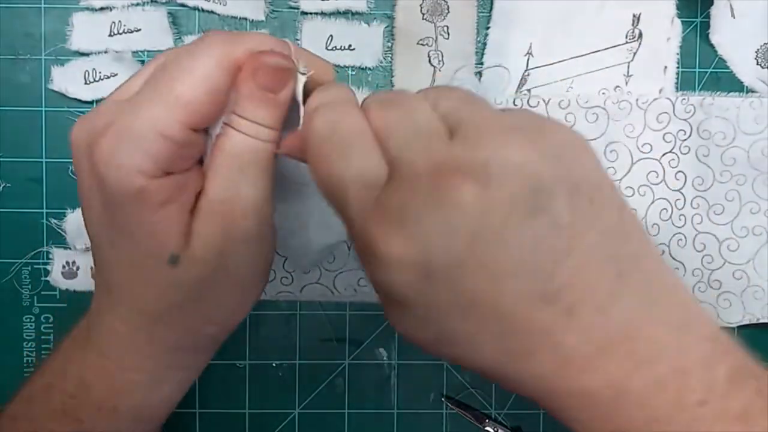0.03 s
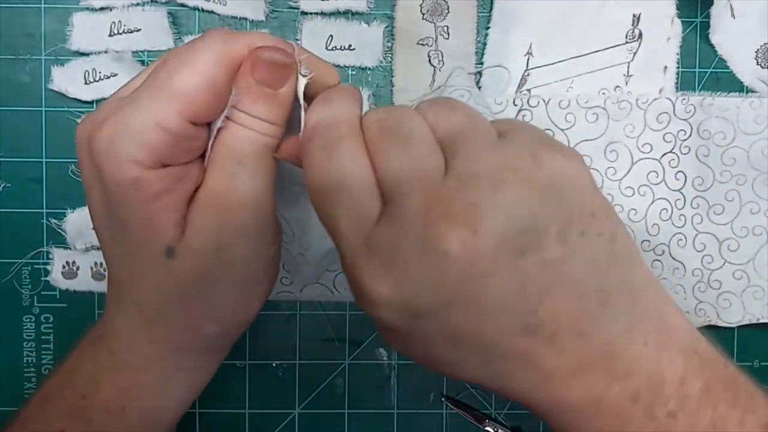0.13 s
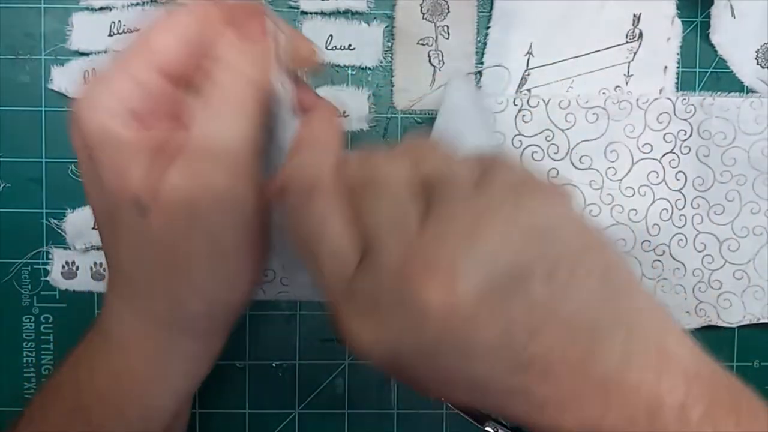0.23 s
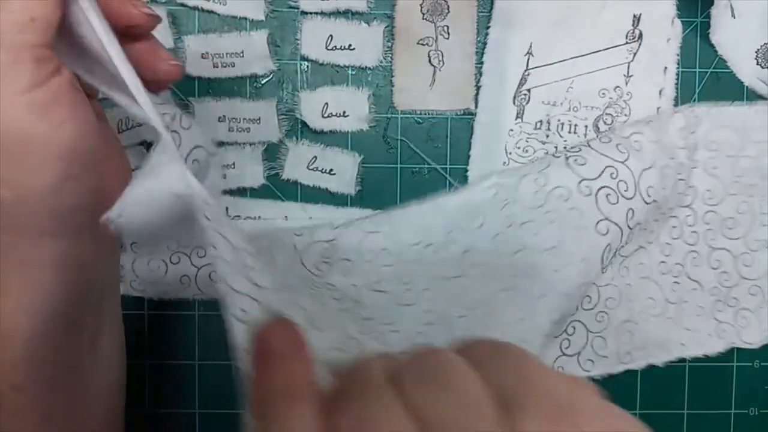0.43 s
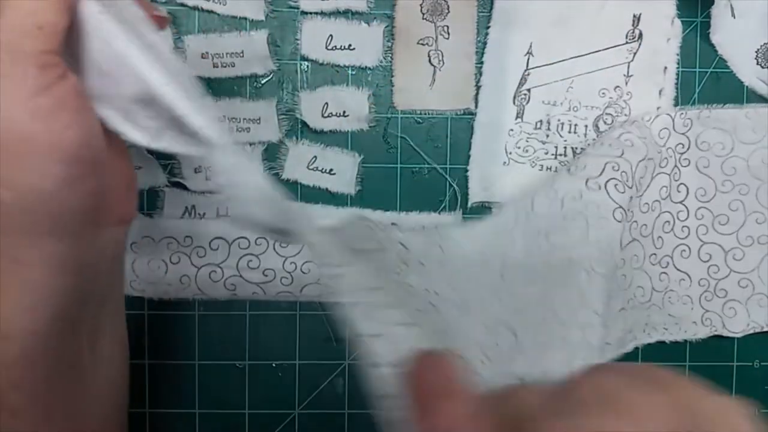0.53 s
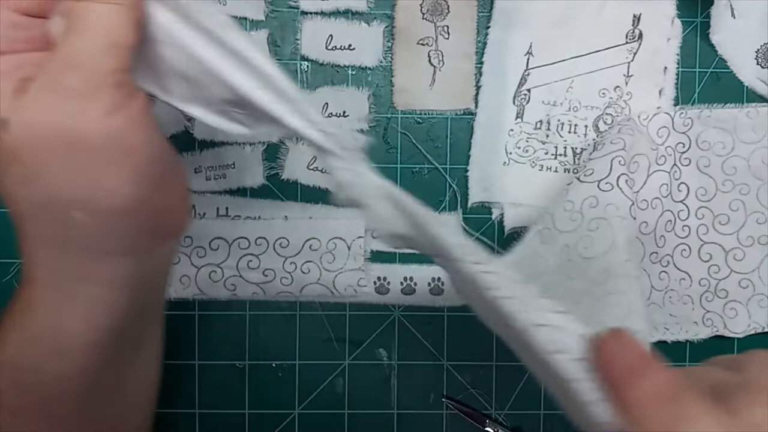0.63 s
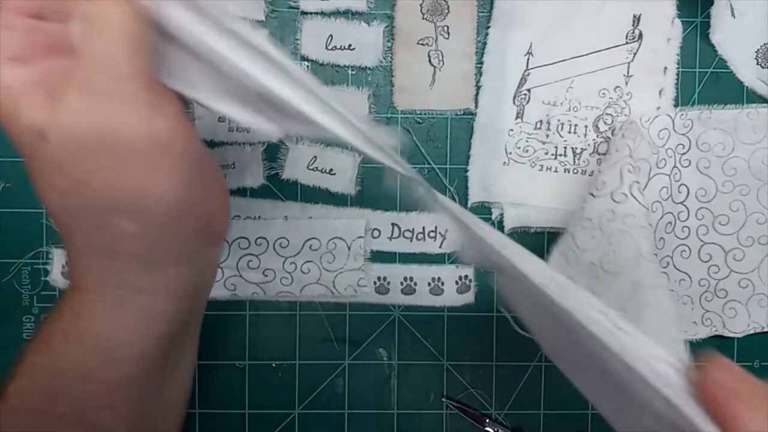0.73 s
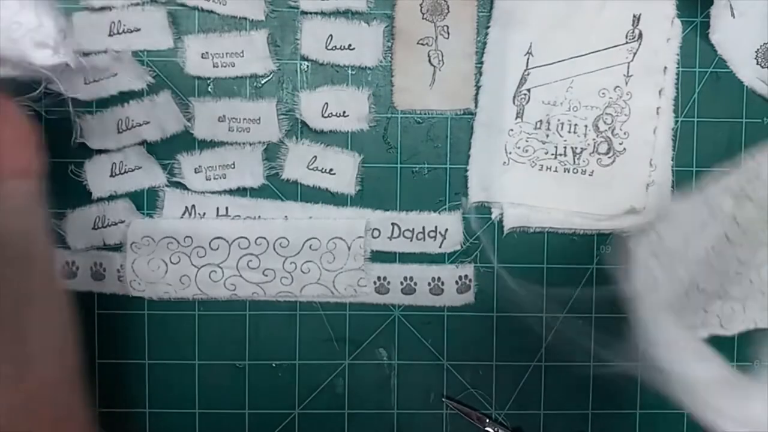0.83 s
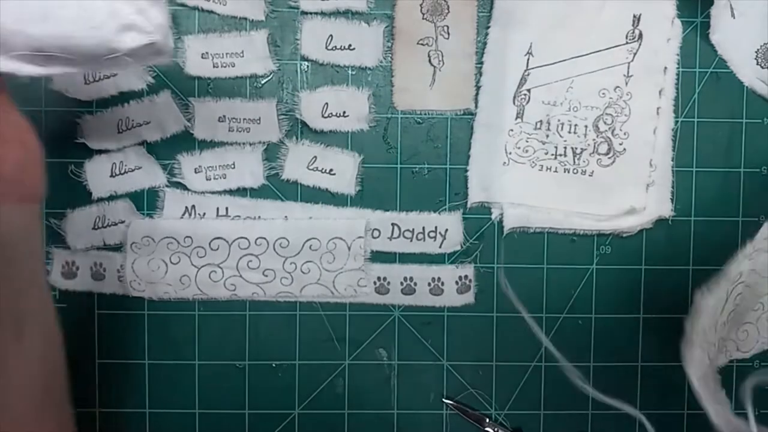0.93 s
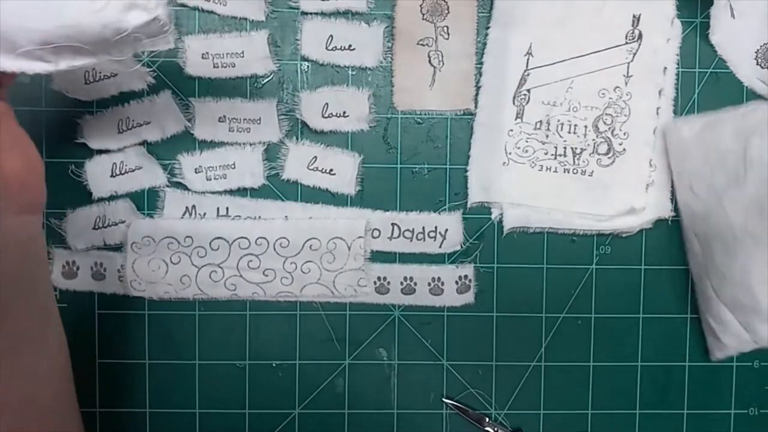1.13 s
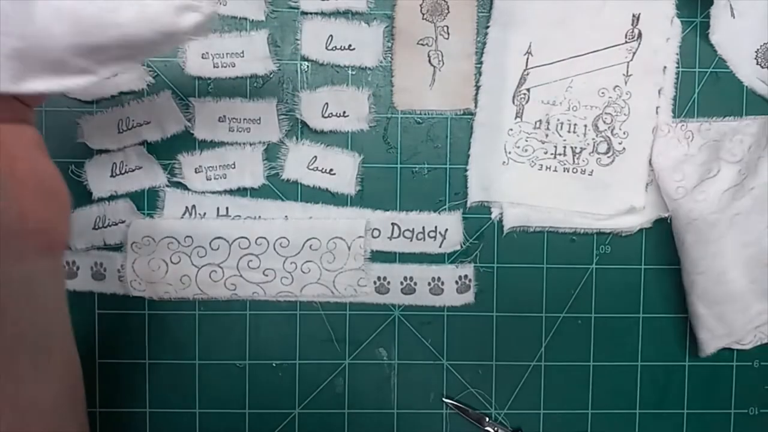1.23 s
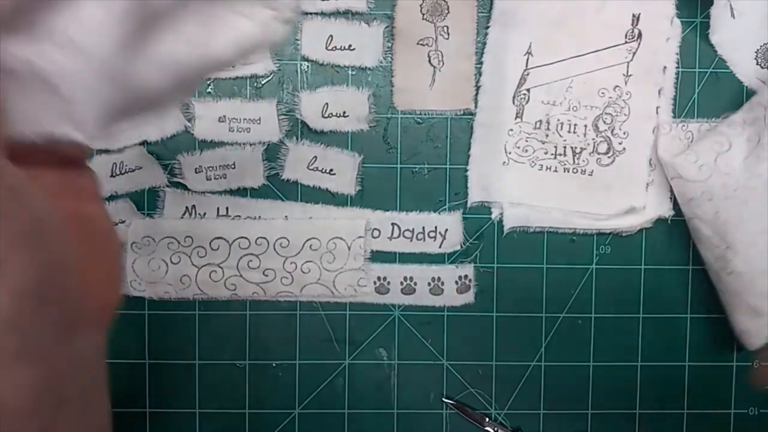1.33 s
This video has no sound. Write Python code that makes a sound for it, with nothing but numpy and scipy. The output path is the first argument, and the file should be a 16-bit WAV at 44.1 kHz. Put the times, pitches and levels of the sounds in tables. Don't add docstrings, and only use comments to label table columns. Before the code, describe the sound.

Close stereo sound of cotton torn by hand in a quiet small room. Faint rustle and finger ticks until 0.2 s, then single threads pop and blur into a loud, bright rip, densest near 0.28 s, coarser and crackling until 0.58 s. After a short gap, a weaker rip at 0.74-0.8 s; the end slaps down at 0.82 s, cloth drags softly, then faint rustles to about 1.4 s.

```python
import sys
import numpy as np
from scipy import signal
from scipy.fft import rfft, irfft
from scipy.io import wavfile
from scipy.ndimage import uniform_filter1d, map_coordinates

SR = 44100
rng = np.random.default_rng(int(sys.argv[2]) if len(sys.argv) > 2 else 0)


def transcribe(u):
    v = np.clip(np.atleast_2d(u).T, -1, 1)
    q = np.round(v * 32767).astype(np.int16)
    wavfile.write(sys.argv[1], SR, q)


def attenuation_scalar(level_db):
    decades = np.asarray(level_db, float) / 20
    return 10 ** decades


N = 61739
LEFT_RIGHT = np.array([[.5], [-.5]])


def evened(x):
    return x / np.sqrt(np.mean(x ** 2) + 1e-20)


def read(points, hz):
    f, value = np.transpose(points)
    return np.interp(np.log(hz + 1), np.log(f + 1), value)


def curves(rows):
    columns = np.transpose(rows)
    return [np.interp(np.arange(N) / SR, columns[0], column) for column in columns]


def causal(points):
    gain_db = read(points, abs(np.fft.fftfreq(8192, 1 / SR)))
    log_gain = np.log(attenuation_scalar(np.maximum(gain_db, -70)))
    taps = np.fft.ifft(np.exp(np.conj(signal.hilbert(log_gain)))).real[:3000]
    return taps / np.linalg.norm(taps)


def colour(x, points):
    return signal.oaconvolve(x, causal(points)[None], axes=1)[:, :N]


# frequency in Hz, left-right likeness from 0 to 1.
SAME = [(60, 0.39), (240, 0.088), (950, 0.096), (3770, 0.007), (15000, 0.075)]


def noise(points, patchy_db):
    frames, hz = N // 128 + 5, np.fft.rfftfreq(512, 1 / SR)
    a, b, c, d, patches = rng.standard_normal((frames, 257, 5)).T
    patches = uniform_filter1d(patches, size=8, axis=0)
    patches = evened(uniform_filter1d(patches, size=14, axis=1))
    same = np.clip(read(SAME, hz), -1, 1)[:, None]
    left, other = a + 1j * b, c + 1j * d
    right = same * left + np.sqrt(1 - same ** 2) * other
    z = np.array([left, right]) * attenuation_scalar(read(points, hz)[:, None] + patchy_db * patches)
    return evened(signal.istft(z, nperseg=512, noverlap=384)[1][:, :N])


def swell(at, half_s):
    return np.exp(-((np.arange(N) / SR - at) / half_s) ** 2)


# frequency in Hz, level in dB.
FLOOR = [(15, -55), (25, -20.5), (102, 4.5), (242, -17.5), (270, -24), (354, -15.5), (840, -14),
         (1040, -22.5), (16000, -33)]
# time in seconds, rustle in dB, rumble in dB.
HANDS = [(0, -64, -69), (0.152, -68.5, -65), (.19, -68, -78), (.24, -73, -58), (.3, -82.5, -60),
         (.35, -91, -65), (.43, -82, -56), (0.571, -76, -45), (.63, -69, -61.5), (.7, -73, -85),
         (.76, -78, -55), (0.821, -78, -44.5), (.9, -71.5, -63), (1.05, -93, -88), (1.17, -88.5, -70.5),
         (1.27, -90, -67), (1.36, -74.5, -63), (1.4, -81.5, -68)]
# frequency in Hz, level in dB.
RUSTLE = [(150, -32.5), (250, -4.5), (955, -10.5), (1470, -7), (2130, -24), (11100, -30), (16000, -40.5)]
RUMBLE = [(18, -45), (32, -16), (60, 1.5), (172, -10.5), (300, -10), (600, -78)]
# centre in seconds, half length in seconds, level in dB.
BRUSHES = [
    (0.114, 0.026, -71),
    (1.232, 0.0217, -71.5),
    (1.368, 0.017, -77),
]
# frequency in Hz, level in dB.
BRUSH = [(1500, -30), (5000, 0), (16000, -2)]
DRAG = [(300, -33), (550, -2), (700, -1), (900, -22), (1600, -23.5)]


def background():
    _, rustle_db, rumble_db = curves(HANDS)
    brushing = sum(attenuation_scalar(db) * swell(at, half_s) for at, half_s, db in BRUSHES)
    floor = attenuation_scalar(-66) * noise(FLOOR, patchy_db=.8)
    brushes = brushing * noise(BRUSH, patchy_db=1.5)
    rustle = attenuation_scalar(rustle_db) * noise(RUSTLE, patchy_db=2.0)
    rumble = attenuation_scalar(rumble_db) * noise(RUMBLE, patchy_db=-1.0)
    drag = attenuation_scalar(-63.5) * swell(at=0.883, half_s=0.065) * noise(DRAG, patchy_db=1.5)
    return floor + brushes + rustle + rumble + drag


def cracks(size, pan_db, count, burst_db=3.5):
    port_lag_s, burst_s = 0.00018, 0.00047
    t, out = np.arange(400) / SR, np.zeros((2, N))
    kind = rng.integers(0, count, N)
    for k in range(count):
        lag, life = rng.uniform(-0.9, 1), rng.uniform(.5, 3.0)
        spike = -np.sinc((t - 12 / SR) * SR - LEFT_RIGHT * lag * port_lag_s * SR)
        burst = rng.standard_normal((2, len(t))) * np.exp(-t / (burst_s * life)) * (t > 10 / SR)
        shape = spike + attenuation_scalar(burst_db) * burst / np.linalg.norm(burst[0])
        shape = shape / np.linalg.norm(shape[0])
        hits = (size * (kind == k))[None]
        out += signal.oaconvolve(hits, shape, axes=1)[:, 12:N + 12]
    return out * attenuation_scalar(LEFT_RIGHT * pan_db)


def train(rows, gain_db):
    size = np.zeros(N)
    for s, peak_db in rows:
        size[round(s * SR)] = 3 * attenuation_scalar(peak_db + gain_db)
    return size


# time in seconds, peak in dB, left-right difference in dB.
TICKS = [
    (0.094, -55, -5),
    (0.168, -53, 0),
    (1.04, -72, -2.5),
]


def finger_ticks():
    ticks = sum(cracks(train([(s, db)], 0), pan_db, count=1) for s, db, pan_db in TICKS)
    return colour(ticks, CRACK)


# time in seconds, peak in dB.
SLAPS = [
    (.8175, -13.5),
    (.8188, -13),
    (.8201, -22),
    (.8219, -28),
    (.8263, -31),
]
# frequency in Hz, level in dB.
SLAP = [(30, -40), (100, -13), (1100, -6), (1800, -9), (2900, 1), (4300, -9), (6000, -13), (16000, -11)]


def end_slaps():
    return colour(cracks(train(SLAPS, gain_db=-2), pan_db=1, count=4, burst_db=-7), SLAP)


def shaded(x):
    shade_db = 1.5
    hz, t, z = signal.stft(x, SR, nperseg=256, noverlap=192)
    field = rng.standard_normal((len(t), len(hz), 3)).T
    field = field[:2] + field[2]
    field = uniform_filter1d(field, size=5, axis=1)
    field = evened(uniform_filter1d(field, size=30, axis=2))
    return signal.istft(z * attenuation_scalar(shade_db * field), SR, nperseg=256, noverlap=192)[1][:, :N]


# time in seconds, table delay in ms, table level in dB, hand delay in ms, hand level in dB.
BOUNCES = [
    (.2, 1.06, -11.5, 1.84, -4),
    (.3, 0.96, -3, 1.78, 1),
    (.34, 1.15, -8.5, 1.9, -10.5),
    (.47, 1.01, -21.5, 2.2, -16),
    (.58, 1.21, -14.5, 2.1, -5.5),
    (.73, 1.13, -14.5, 2.7, -34),
    (.85, 1.18, -28, 2.03, -16),
]


def bounced(x):
    _, table_ms, table_db, hand_ms, hand_db = curves(BOUNCES)
    dull = signal.sosfilt(signal.butter(1, 6000, fs=SR, output="sos"), x)

    def late(ms):
        moment = np.arange(N) - ms * SR / 1000
        return np.array([map_coordinates(channel, [moment], order=3) for channel in dull])

    return x + attenuation_scalar(table_db) * late(table_ms) + attenuation_scalar(hand_db) * late(hand_ms)


def rip(pull, threads, crack, late_crack, taut, slack, open_s):
    t = np.arange(N) / SR
    s, level_db, flap_db, pan_db, rate = curves(pull)
    rate = np.maximum(rate, 50)
    torn = (s - s[0]) / (s[-1] - s[0])

    spread = evened(attenuation_scalar(1.5 * np.minimum(rng.exponential(1, N), 3)))
    broken = (s == t) * (rng.random(N) < rate / SR)
    small = broken * spread * attenuation_scalar(level_db - 3.5) * np.sqrt(SR / rate)
    thick = train(threads, gain_db=-2)

    push = -(small + attenuation_scalar(1.5) * thick) * attenuation_scalar(flap_db) * (1 + 0.93 * rng.standard_normal((2, N)))
    flap = colour(push * np.sqrt(1 - torn), taut) + colour(push * np.sqrt(torn), slack)

    breaks = cracks(small, pan_db, count=24) + cracks(thick, pan_db, count=24, burst_db=1.5)
    snap = bounced(colour(breaks * (1 - torn ** 2), crack) + colour(breaks * torn ** 2, late_crack))
    thin = signal.sosfilt(signal.butter(2, 2620, "high", fs=SR, output="sos"), snap)
    opened = np.clip((s - s[0]) / open_s, 0, 1)
    return shaded(thin + opened * (snap - thin) + flap)


# time in seconds, crack level in dB, flap relative to crack in dB,
# left-right difference in dB, small threads per second.
SECOND_PULL = [
    (.735, -33, -13, -3, 5940),
    (.739, -25.5, -13.5, -1.5, 8920),
    (.765, -21, -18.5, -1, 7000),
    (.77, -30.5, -11, 1.5, 6000),
    (.8, -40.5, -3, -4.5, 5000),
    (.824, -34.5, -4, 0, 4995),
    (.845, -39.5, -4.5, 0, 5020),
    (.87, -78, 4, -6, 4950),
]
# time in seconds, peak in dB.
END_SNAPS = [(0.7374, -13), (.7426, -20), (.7466, -12), (.7498, -16), (.7529, -16), (.7555, -26),
             (.7582, -25), (.7609, -23), (.7632, -21), (.7642, -13), (.7675, -32), (.7721, -31),
             (.8088, -24.5), (.8114, -23), (.8408, -34.5)]
# frequency in Hz, level in dB.
END_CRACK = [(530, -30.5), (800, -8), (1340, -15), (1720, -5), (2250, -7.5), (2750, -7.5), (6000, -14.5),
             (14900, -12.5), (16000, -16)]
END_FLAP = [(35, -65), (120, -36.5), (400, -7.5), (700, -2.5), (1100, -12), (1700, -11), (3000, -45)]
LOOSE_FLAP = [(30, -52), (90, -14.5), (300, 2.5), (500, -4.5), (750, -4.5), (1100, -8.5), (1600, -24.5),
              (3000, -74)]


def second_rip():
    return rip(SECOND_PULL, END_SNAPS, END_CRACK, END_CRACK, END_FLAP, LOOSE_FLAP, open_s=0.00033)


# time in seconds, crack level in dB, flap relative to crack in dB,
# left-right difference in dB, small threads per second.
FIRST_PULL = [
    (.202, -51, -22.5, -4, 680),
    (.258, -17, -23.5, -2.5, 5500),
    (.29, -15, -23, -1, 11000),
    (.318, -18.5, -11, -3.5, 7700),
    (.405, -23.5, -12.5, -1.5, 1200),
    (.465, -19.5, -11, 0, 2500),
    (.536, -23.5, -12.5, 1, 2000),
    (.556, -37, -13.5, -1.5, 1000),
    (.58, -20, -14.5, -2.5, 990),
]
# time in seconds, peak in dB.
START_THREADS = [(.2023, -19), (.2053, -31), (.2108, -22), (.2132, -18.5), (.215, -27), (.2205, -21),
                 (.224, -24), (.2267, -14), (.2276, -13), (.2323, -13.5), (.2348, -16), (.2376, -13),
                 (.2404, -14), (.2435, -8), (.2449, -14), (.2472, -12), (.2498, -11)]
FAST_THREADS = [(.2528, -10.5), (.257, -8.5), (.26, -12), (.2656, -10), (.2675, -9.5), (.2707, -7),
                (.273, -11.5), (.2749, -9), (.2765, -9), (.279, -7.5), (.2825, -6.5), (.2852, -11),
                (.2869, -8), (.2913, -9), (.2928, -7), (.2986, -12.5), (.3019, -12), (.3033, -10.5),
                (.306, -9.5), (.31, -12.5), (.3124, -8.5), (.3154, -11.5), (.3218, -13.5), (.3248, -10.5),
                (.3325, -16.5)]
MID_THREADS = [(0.3361, -14.5), (0.3431, -12), (0.3461, -12), (0.352, -11.5), (0.3584, -9.5),
               (0.361, -16.5), (0.3665, -11), (0.3741, -8), (0.3786, -14.5), (0.3822, -16.5), (0.3884, -18),
               (0.3941, -13.5), (0.3972, -13.5), (0.4007, -13), (0.4096, -10.5), (0.4161, -9),
               (0.4239, -6.5), (0.4273, -9), (0.4305, -17), (0.4338, -8.5), (0.4365, -7), (0.4474, -10),
               (0.4517, -22), (0.4551, -10.5), (0.4586, -10.5), (0.4623, -7.5), (0.4653, -12.5),
               (0.4681, -12.5)]
LATE_THREADS = [(0.4723, -7), (0.4734, -12.5), (0.4806, -13.5), (0.483, -11.5), (0.4863, -19.5),
                (0.4894, -15), (0.49, -16), (0.497, -8.5), (0.5018, -11), (0.5045, -15), (0.5092, -7),
                (0.5132, -13), (0.5178, -19), (0.5225, -8.5), (0.5252, -11), (0.5282, -22), (0.532, -14),
                (0.5347, -13.5), (0.5396, -12.5), (0.5433, -16), (.548, -23), (0.5491, -11), (.55, -13.5),
                (.5509, -14.5), (0.5625, -7), (0.5656, -12.5), (0.5699, -11), (0.5734, -6.5), (0.5769, -9),
                (.579, -12.5)]
# frequency in Hz, level in dB.
CRACK = [(530, -25.5), (900, -5.5), (1400, -10.5), (1720, -5), (2250, -6), (3600, -4.5), (9310, -6),
         (11300, -3), (16000, -9.5)]
LATE_CRACK = [(530, -27), (1100, -12), (1800, -2), (2300, -3.5), (3300, -1), (4200, -6), (6500, -9.5),
              (12000, -5), (16000, -5.5)]
FLAP = [(35, -66.5), (80, -35.5), (450, -11.5), (850, -5), (1150, -11), (1350, -13.5), (1700, -14),
        (3000, -56.5)]
SLACK_FLAP = [(35, -54), (70, -22.5), (230, -14), (380, -9.5), (650, -3), (900, -9), (1200, -17.5),
              (1700, -18), (3000, -76)]


def first_rip():
    threads = START_THREADS + FAST_THREADS + MID_THREADS + LATE_THREADS
    return rip(FIRST_PULL, threads, CRACK, LATE_CRACK, FLAP, SLACK_FLAP, open_s=0.057)


def echoes(x, t60_points, gap_s, count=3):
    first, out = round(gap_s * SR), 0
    for k in range(count):
        taps = np.zeros((2, SR // 2))
        grid = np.arange(first, SR // 2 - 12, 12)
        at = grid + rng.integers(0, 12, (2, len(grid)))
        np.put_along_axis(taps, at, rng.choice([-1., 1.], at.shape), 1)
        hz, t, z = signal.stft(taps, SR, nperseg=128)
        decay = attenuation_scalar(-60 * t / read(t60_points, hz)[:, None])
        tail = signal.istft(z * decay, SR, nperseg=128)[1]
        tail = tail / np.linalg.norm(tail[0])
        turn = np.sqrt(2 / count) * np.cos(np.pi * (9 * np.arange(N) / SR + k / count))
        out = out + signal.fftconvolve(x * turn, tail, axes=1)[:, :N]
    return out


# frequency in Hz, time to fall 60 dB in seconds.
ROOM = [(500, .12), (2500, .185), (14000, .15)]


def in_room(cloth):
    near = echoes(cloth, [(100, 0.017), (15000, 0.017)], gap_s=.001)
    room = echoes(cloth, ROOM, gap_s=.006)
    return cloth + attenuation_scalar(-5.5) * near + attenuation_scalar(-14) * room


# frequency in Hz, side gain in dB.
PORT_SIDE = [(100, 2), (400, -6), (1000, -6), (2500, -2.5), (8000, 0.5)]


def at_ports(wet):
    width = attenuation_scalar(read(PORT_SIDE, np.fft.rfftfreq(N, 1 / SR)))
    side = irfft(rfft(wet[0] - wet[1]) * width, N)
    return (wet.sum(0) + np.array([side, -side])) / 2


def scene():
    cloth = finger_ticks() + end_slaps() + second_rip() + first_rip()
    return background() + at_ports(in_room(cloth))


def roll_off(x):
    return signal.sosfilt(signal.butter(12, 16990, fs=SR, output="sos"), x)


def record(dry):
    ceiling, low_cut_hz, edge_hz = .9, 53, 15800
    limited = ceiling * np.tanh(dry / ceiling)
    cut = signal.sosfilt(signal.butter(3, low_cut_hz, "high", fs=SR, output="sos"), limited)
    band_limit = signal.firwin(401, edge_hz, window=("kaiser", 7), fs=SR)
    mix = signal.oaconvolve(cut, band_limit[None], "same")
    return roll_off(mix)


dry = scene()
out = record(dry)
transcribe(out)
```